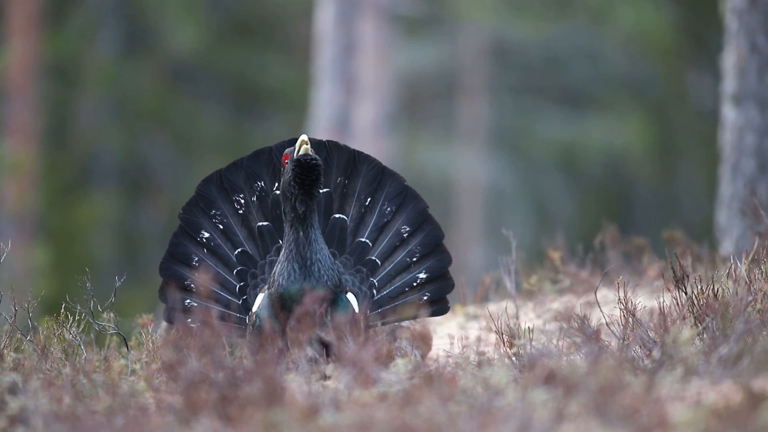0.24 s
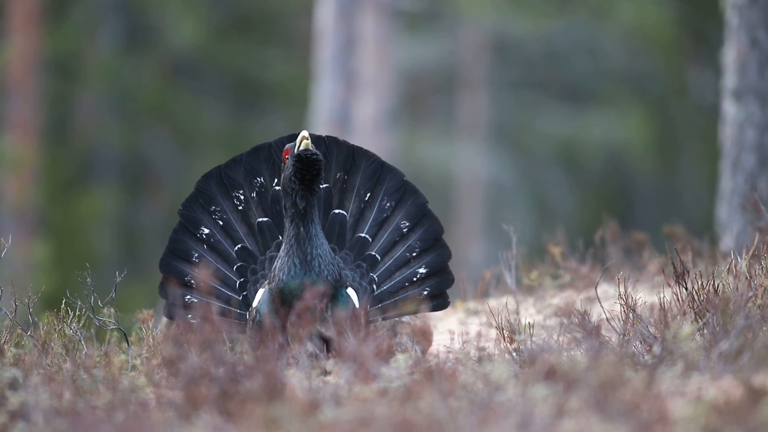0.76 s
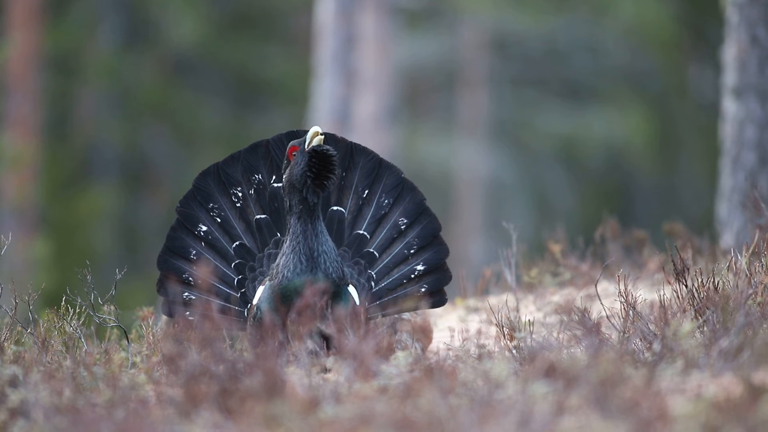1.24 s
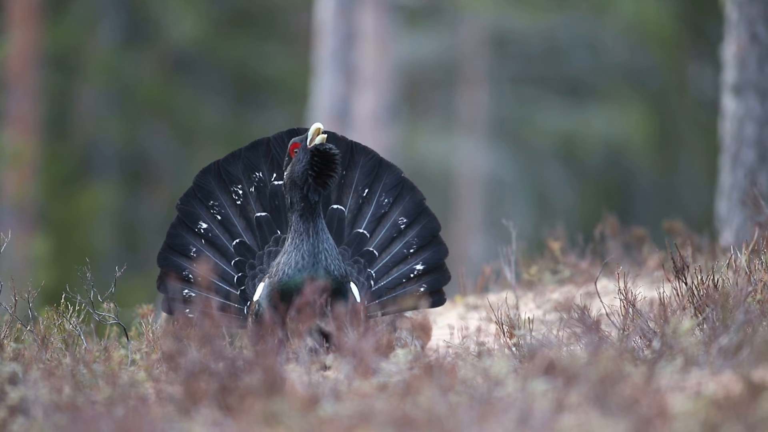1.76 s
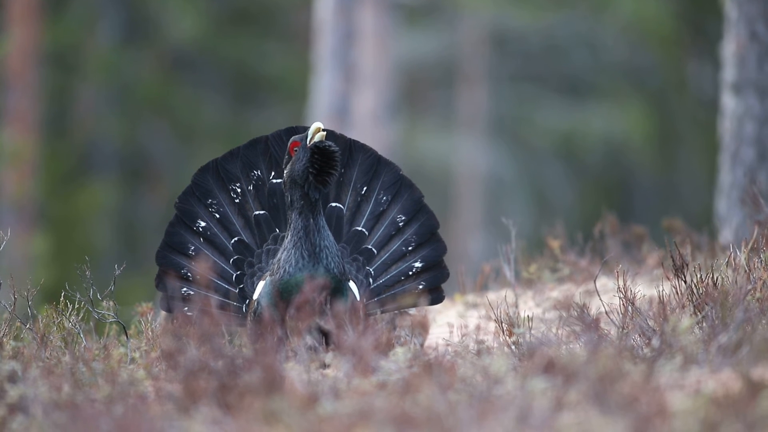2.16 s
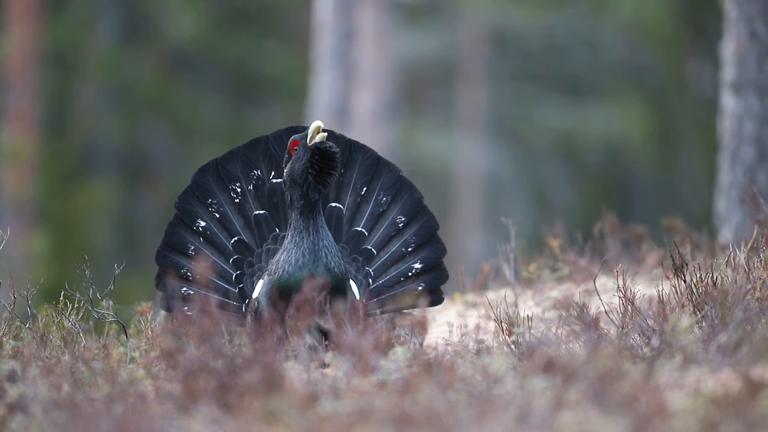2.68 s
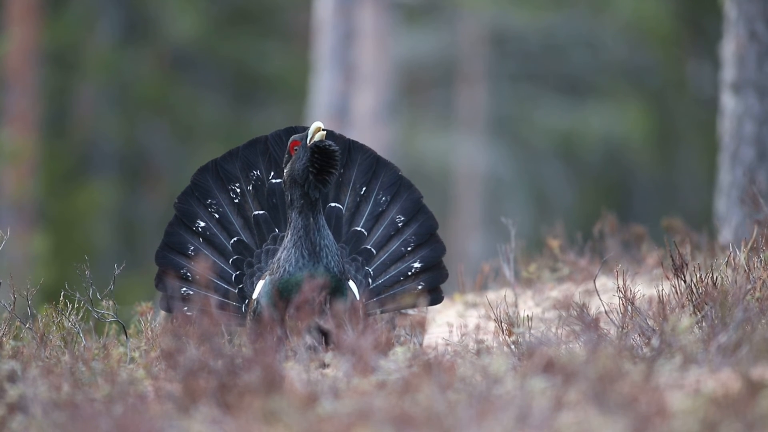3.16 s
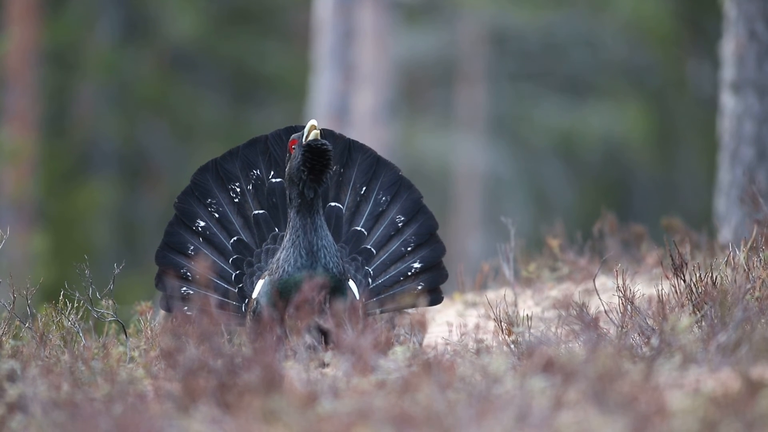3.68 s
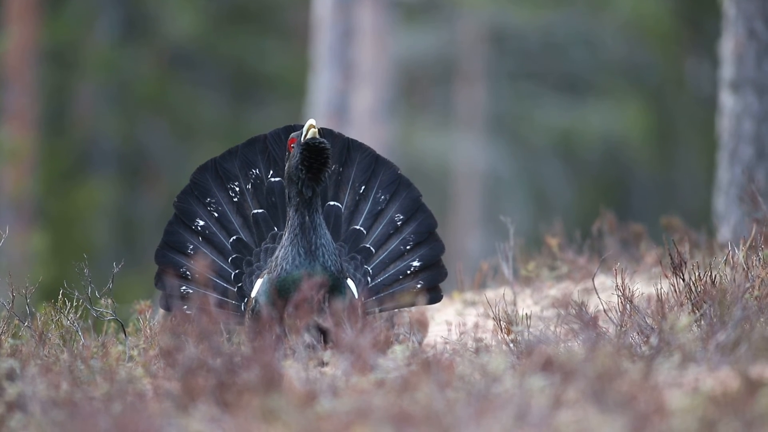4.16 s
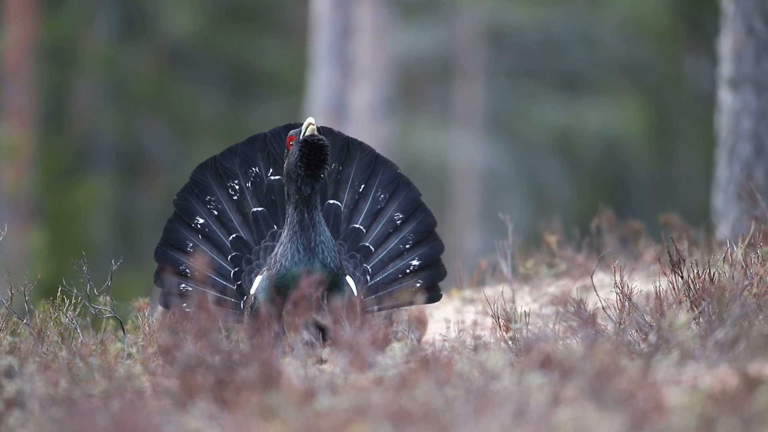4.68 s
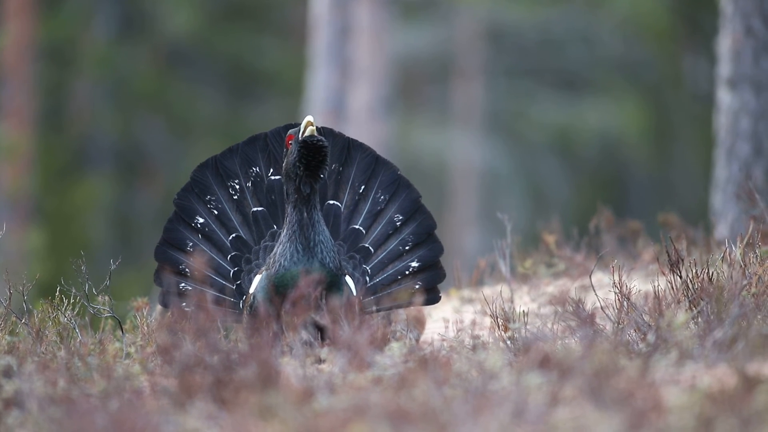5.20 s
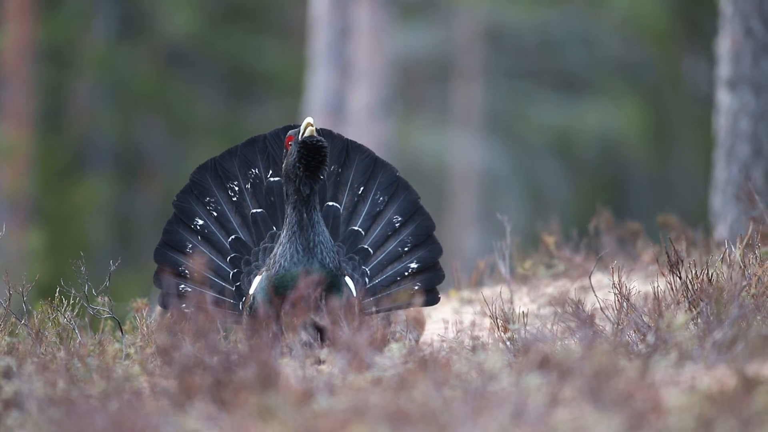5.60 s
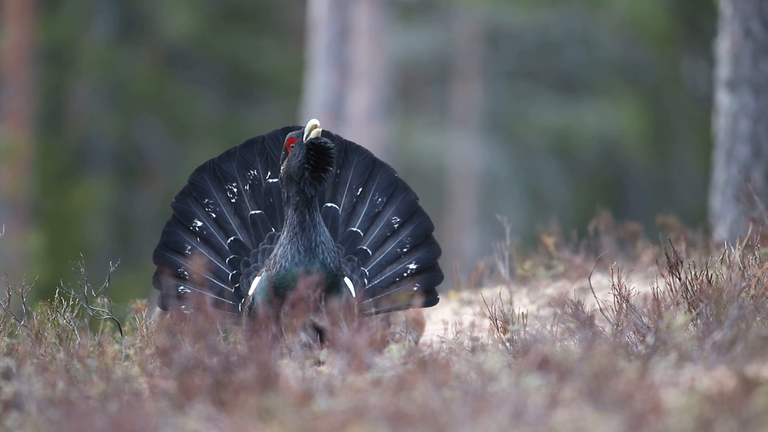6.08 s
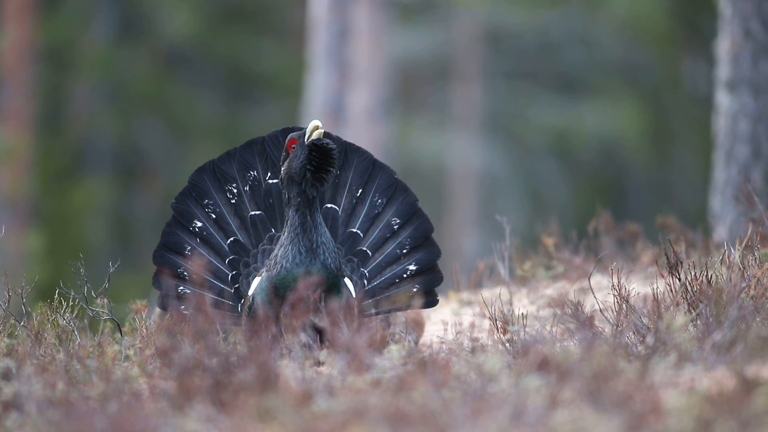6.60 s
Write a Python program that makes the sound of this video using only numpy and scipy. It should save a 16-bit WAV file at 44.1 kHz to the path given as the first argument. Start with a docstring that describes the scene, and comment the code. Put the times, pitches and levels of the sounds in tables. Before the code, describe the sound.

Close, wooden double clicks from a displaying forest bird, occasional dull ground thuds, and faint thrush song and thin whistles echoing among trees.

```python
"""Grouse display in a pine wood

A capercaillie cock displays in a quiet pine wood: pairs of dry, hollow clicks ring as damped tones of his
throat and open beak. Four soft thumps, likely his steps, are short pushes that make the peaty ground swing.
Far off, small birds whistle and a thrush sings in gliding tones, smeared by noisy echoes from the trees.
Coloured noise makes the low rumble and faint hiss behind them."""
import sys
import numpy as np
from scipy import signal
from scipy.fft import rfft, irfft, next_fast_len
from scipy.io import wavfile
from scipy.ndimage import map_coordinates

SR = 44100
rng = np.random.default_rng(int(sys.argv[2]) if len(sys.argv) > 2 else 0)


def generate_wav(signal):
    """Clip the signal to [-1, 1] and save it as 16-bit WAV at the path in sys.argv[1]."""
    frames = np.transpose(np.atleast_2d(signal))
    scaled = np.clip(frames, -1, 1) * 32767
    pcm = np.round(scaled).astype(np.int16)
    wavfile.write(sys.argv[1], SR, pcm)


N = 302085  # length in samples


def amp(db):
    """Turn decibels into a gain."""
    return 10 ** (np.asarray(db) / 20)


def unit(x):
    """Scale a sound to an average (rms) level of 1."""
    return x / np.sqrt(np.mean(x ** 2) + 1e-20)


def along(points, hz):
    """Read a curve of (Hz, value) points, with the frequencies spaced by ratio."""
    point_hz, values = np.transpose(points)
    return np.interp(np.log(hz + 1), np.log(point_hz + 1), values)


def filtered(x, response):
    """Multiply each frequency of a sound by the response at that frequency."""
    n = x.shape[-1]
    padded = next_fast_len(n + 8192)
    spectrum = rfft(x, padded)
    hz = np.fft.rfftfreq(padded, 1 / SR)
    return irfft(spectrum * response(hz), padded)[..., :n]


def noise(spectrum, shape):
    """Colour random noise by a curve of (Hz, dB) points and scale it to rms 1."""
    white = rng.standard_normal(shape)
    return unit(filtered(white, lambda hz: amp(along(spectrum, hz))))


def add(track, s, sound):
    """Mix a sound into a track at s seconds; a sound that began before zero loses its start."""
    start = round(s * SR)
    sound = sound[max(-start, 0):]
    part = track[max(start, 0):][:len(sound)]
    part += sound[:len(part)]


def scatter(x, stretch):
    """The tree trunks answer a sound with a noisy tail in which each frequency dies at its own speed."""
    # Each row: frequency in Hz, time to fall by 60 dB in seconds before stretching.
    tree_decay = [(200, 0.97), (1500, 0.48), (3000, 0.58), (5000, 0.37), (10000, 0.83)]
    hz, t, cells = signal.stft(rng.standard_normal(SR * 3 // 4), SR, nperseg=256)
    fall_s = stretch * along(tree_decay, hz)[:, None]
    tail = signal.istft(cells * amp(-60 * t / fall_s), SR, nperseg=256)[1]
    return signal.fftconvolve(x, tail / np.linalg.norm(tail))


def in_wood(timed_sounds, wet_db, stretch):
    """Place (start in seconds, sound) pairs on a track, each with its own echoes from the trunks."""
    track = np.zeros(N)
    for s, sound in timed_sounds:
        add(track, s, sound)
        add(track, s, amp(wet_db) * scatter(sound, stretch))
    return track


def capercaillie():
    """Double clicks, close by and nearly dry, are tuned by the slackening of the throat during the display."""
    # Each row: start in seconds, rms level of the first 10 ms in dB before the overall trim,
    # beak resonance in Hz, then levels in dB of beak, windpipe, gullet, bright modes and pop;
    # these five are set against the mouth resonance.
    click_rows = [(0.1956, -27.5, 3350, -10.5, -4, -0.5, -5, 2),
                  (0.331, -38, 3260, 1.5, 15.5, 6.5, 21.5, -8), (1.0858, -28, 3200, -5, 3, 1.5, -4, 6.5),
                  (1.2098, -35.5, 3134, 3.5, 7.5, -1, 12.5, -21),
                  (1.905, -29, 3160, -19, 0.5, -1, -14, 3.5), (2.0369, -33.5, 3050, -6, -2, -32, 4.5, -22),
                  (2.835, -30.5, 3070, -28, 3, 1.5, 5, -1), (2.9665, -35, 3030, -3.5, -1.5, -10, 6, -7),
                  (3.7176, -32.5, 3320, -27, 6.5, 2, 11, -15), (3.8535, -34, 2980, -3, -2.5, -6.5, 5, 3),
                  (5.1424, -30.5, 3010, 0.5, 6, -4.5, 13, -5), (5.2937, -34.5, 3000, 1, -4, 3.5, -4, 13)]
    # Each row: time in seconds, windpipe tuning as a ratio, mouth resonance in Hz.
    throat_setting = [(0.2, 1.044, 2856), (1.1, 1.02, 2794), (2.0, 1.0, 2762), (3.75, 1.0, 2590),
                      (5.2, 1.005, 2620)]
    times, tunings, mouths_hz = np.transpose(throat_setting)
    clicks = []
    for s, db, *colour in click_rows:
        tuning = np.interp(s, times, tunings)
        mouth_hz = np.interp(s, times, mouths_hz)
        clicks.append((s, click(db, tuning, mouth_hz, *colour)))
    return amp(-3.5) * in_wood(clicks, wet_db=-11.0, stretch=0.53)


def click(db, tuning, mouth_hz, beak_hz, beak_db, windpipe_db, gullet_db, bright_db, pop_db,
          gullet_hz=2145, gullet_t60=0.027, mouth_t60=0.032, beak_t60=0.05,
          pop_hz=2700, pop_t60=0.013, snap_db=-12, soft_hz=6300):
    """One sudden release of air pops and rings windpipe, gullet, mouth and beak, with a short noisy snap."""
    # The windpipe's low modes. Each row: frequency in Hz and time to fall by 60 dB in seconds (first
    # and last), both before tuning, with the level in dB within the group between them.
    windpipe_modes = [(250, -17, .06), (325, -17, .06), (812, -24.5, .07), (1452, -13.5, .058)]
    # The bright modes of the open beak. Each row: frequency in Hz, level in dB within the group,
    # time to fall by 60 dB in seconds; a small random retuning follows.
    bright_modes = [(3970, -19, 0.036), (4190, -14, 0.017), (4570, -25.5, 0.028), (5280, -28.5, 0.029),
                    (6180, -28.5, 0.0051), (5950, -25, 0.018), (8200, -11.5, 0.011)]
    # The colour of the snap. Each row: frequency in Hz, relative level in dB.
    snap_colour = [(300, -25), (1200, -48), (2000, -2), (2900, 6.5), (4200, -17), (6200, -3.5), (7000, -26),
                   (15000, -30)]
    t = np.arange(SR // 8) / SR
    windpipe = amp(windpipe_db) * ring(windpipe_modes, t * tuning)
    cavities = [(gullet_hz, gullet_db, gullet_t60), (mouth_hz, 0, mouth_t60), (beak_hz, beak_db, beak_t60)]
    mouth = ring(cavities, t)
    bright = amp(bright_db) * ring(bright_modes, t * rng.normal(1, 0.013), spread=2.1)
    # the pop swells within about a cycle, then dies away
    pop = ring([(pop_hz, pop_db, pop_t60)], t) * (1 - np.exp(-t * pop_hz))
    # the release takes a moment, which rounds off the highest treble
    soften = signal.butter(8, soft_hz, fs=SR, output="sos")
    sound = signal.sosfilt(soften, windpipe + mouth + bright + pop)
    snap_fade = amp(-60 * t / .026)
    sound = sound + amp(snap_db) * snap_fade * noise(snap_colour, len(t))
    return amp(db) * sound / np.std(sound[:SR // 100])


def ring(modes, t, spread=0):
    """Sum dying tones whose levels vary a little each time; spread scatters their starting phases."""
    total = 0
    for hz, db, t60 in modes:
        level = amp(db + .5 * rng.standard_normal() - 60 * t / t60)
        total = total + level * np.cos(2 * np.pi * hz * t + spread * rng.standard_normal())
    return total


def steps():
    """A soft push on the peat makes the ground swing a few times and settle on its lowest mode."""
    # Each row: start in seconds, peak level in dB.
    step_rows = [(0.2324, -22), (1.0834, -16), (2.0364, -12.5), (4.4388, -12)]
    # The springy peat. Each row: resonance in Hz, width in Hz.
    ground_modes = [(64, 12), (102.5, 28)]
    push = signal.butter(4, 73, fs=SR, output="sos")
    thump = signal.sosfilt(push, signal.unit_impulse(SR // 2))
    for centre, width in ground_modes:
        thump = signal.lfilter(*signal.iirpeak(centre, centre / width, fs=SR), thump)
    # a small patch of ground radiates its slowest motion poorly
    radiation = signal.butter(2, 172, "high", fs=SR, output="sos")
    thump = signal.sosfilt(radiation, thump)
    track = np.zeros(N)
    for s, db in step_rows:
        add(track, s, amp(db) * thump / np.abs(thump).max())
    return track


def thrush():
    """The thrush strings syllables together among echoing trunks, building up with a trill."""
    # The song. Each row: start in seconds, level in dB before the overall trim, syllable name.
    song_rows = [(0.0, -62, "whistle"), (0.705, -65, "mew"), (0.8, -68.5, "hum"), (1.46, -63, "mew"),
                 (1.715, -67, "hum"), (1.809, -76, "tsip"), (2.205, -68, "tsip"), (2.946, -52.5, "warble"),
                 (3.139, -51.5, "warble"), (3.336, -50.5, "flourish"), (3.622, -65, "squeak"),
                 (3.741, -54, "rasp"), (4.225, -64, "upslur"), (4.622, -64, "chip"), (4.691, -61, "chip"),
                 (4.846, -55.5, "upslur")]
    # What it can sing, by name. Each row of a syllable: delay in seconds, length in seconds,
    # first, middle and last pitch in Hz, level in dB within the syllable, buzz swing in Hz.
    syllable_notes = { "whistle": [(0, .11, 2690, 2770, 2730, 0, 75)],
                      "mew": [(0, .15, 2740, 2660, 2480, 0, 120)],
                      "hum": [(0, .06, 1970, 2000, 1970, 0, 30)],
                      "tsip": [(0, .06, 5000, 4480, 4300, 0, 50)],
                      "rise": [(0, .04, 1700, 1940, 2020, 0, 0)],
                      "squeak": [(0, .035, 4050, 4450, 4700, 0, 200)],
                      "fall": [(0, .038, 3750, 2940, 2570, 0, 0)],
                      "warble": [(0, .035, 3100, 2950, 2660, -2, 90), (.034, .04, 2560, 3180, 3330, 0, 230),
                      (.088, .034, 1920, 2400, 2330, -4, 0), (.121, .014, 2480, 2050, 1310, -5.5, 0)],
                      "flourish": [(0, .135, 3480, 3600, 3420, -6, 130),
                      (.124, .041, 2980, 2290, 1960, -6.5, 120), (.161, .034, 1960, 2700, 3120, -1, 35),
                      (.203, .029, 3100, 2720, 1560, 2, 0)], "rasp": [(0, .06, 2400, 2050, 2150, -7, 200),
                      (.049, .135, 2300, 3280, 2410, 0, 280), (.175, .09, 2450, 2100, 1850, -4, 200)],
                      "chip": [(0, .028, 3300, 3000, 2750, 0, 130)],
                      "upslur": [(0, .077, 2590, 2990, 3240, 0, 20)]}
    # the trill: low rises, and over them quicker squeaks and falls
    fall_start_s, fall_period_s, squeak_lead_s = 2.402, .151, .058
    rises = trill("rise", 2.076, .173, db=-64.5, growth_db=0.2, count=5)
    squeaks = trill("squeak", fall_start_s - squeak_lead_s, fall_period_s, db=-74, growth_db=1.5, count=4)
    falls = trill("fall", fall_start_s, fall_period_s, db=-55.0, growth_db=2.1, count=4)
    notes = []
    for s, db, syllable in song_rows + rises + squeaks + falls:
        for delay, *note in syllable_notes[syllable]:
            notes.append((s + delay, amp(db) * slur(*note)))
    return amp(1.5) * in_wood(notes, wet_db=-1.5, stretch=1.67)


def trill(syllable, start_s, period_s, db, growth_db, count):
    """Repeat a syllable at an even pace, louder each time, as (seconds, dB, syllable) rows."""
    return [(start_s + k * period_s, db + k * growth_db, syllable) for k in range(count)]


def slur(length, first_hz, middle_hz, last_hz, db, swing_hz, buzz_hz=190, uneven=0.767):
    """A quick note follows an arc of pitch; in scratchy notes the pitch shakes fast and unevenly."""
    t = np.arange(int(length * SR)) / SR
    curve = np.polyfit([0, .5, 1], [first_hz, middle_hz, last_hz], 2)
    arc = np.polyval(curve, t / length)
    jitter = map_coordinates(rng.standard_normal(256), [2 * buzz_hz * t])
    shake = np.sin(2 * np.pi * buzz_hz * t) + uneven * jitter
    return tone(arc + swing_hz * shake, db, taper=0.33)


def tone(pitch, db, taper):
    """A single bird tone follows a pitch in Hz, with soft ends."""
    envelope = signal.windows.tukey(len(pitch), np.clip(taper, 0, 1))
    return amp(db) * envelope * np.sin(2 * np.pi * np.cumsum(pitch) / SR)


def whistlers():
    """Two small birds far away each repeat their own pair of whistled notes."""
    # One bird see-saws from an upper note to a lower one. Each row: start of the lower note in seconds,
    # lower and upper levels in dB before the overall trim, pitch ratio of the lower.
    seesaw_rows = [(0.871, -61.5, -74, 0.95), (1.386, -59.5, -69, 1), (1.923, -57.5, -65, 1.01),
                   (2.448, -54, -67, 1.018), (3.005, -56.5, -62, 1), (3.544, -55.5, -60, 1.02),
                   (4.068, -57.5, -61.5, 0.99), (4.64, -60, -63, 1.03), (5.231, -57, -62.5, 1.0),
                   (5.804, -58, -63.5, 0.98), (6.355, -54.5, -59.5, 0.99), (6.9, -56.5, -62, .992)]
    # The other answers with a scoop and a sigh. Each row: start of the scoop in seconds,
    # its level in dB before the overall trim.
    answer_rows = [(-.02, -62.5), (0.433, -62), (0.95, -59.5), (4.66, -70), (5.15, -65), (5.598, -58.5),
                   (6.084, -62), (6.566, -61.5)]
    sigh_delay_s, sigh_db = .186, -3  # after the scoop, and against its level
    notes = []
    for s, lower_db, upper_db, ratio in seesaw_rows:
        # the upper note comes first, ever earlier as the song slows
        lead_s = .245 + .0065 * s
        notes.append((s - lead_s, whistle("upper", upper_db)))
        notes.append((s, whistle("lower", lower_db, ratio)))
    for s, db in answer_rows:
        notes.append((s, whistle("scoop", db)))
        notes.append((s + sigh_delay_s, whistle("sigh", db + sigh_db)))
    return amp(-6.0) * in_wood(notes, wet_db=3.5, stretch=1.4)


def whistle(name, db, ratio=1, waver_hz=24, waver_rate=140):
    """A thin note slides onto a held pitch that wavers slightly, by random points at waver_rate a second."""
    # Each named row: length in seconds, first pitch in Hz, held pitch in Hz, slide time in seconds;
    # the pitches are before the ratio.
    whistle_shapes = {"upper": (.13, 4440, 4380, .02), "lower": (.17, 3540, 3320, .035),
                      "scoop": (.17, 3820, 4140, .02), "sigh": (.17, 5120, 4710, .045)}
    length, first_hz, held_hz, slide_s = whistle_shapes[name]
    t = np.arange(int(length * SR)) / SR
    waver = waver_hz * map_coordinates(rng.standard_normal(256), [waver_rate * t])
    slide = held_hz + (first_hz - held_hz) * np.exp(-t / slide_s)
    return tone(ratio * slide + waver, db, taper=0.21)


def background(air_db=-50, hiss_db=-66.0, alike=0.35):
    """Coloured noise gives a low rumble alike in both ears, a partly unrelated hiss and a faint wide layer."""
    # Still air in the wood. Each row: frequency in Hz, relative level in dB per Hz.
    air_colour = [(15, -17.5), (28, -7.5), (42, -13), (65, 1.5), (90, -3), (135, -13), (162, -7),
                  (195, -19), (320, -21), (420, -25), (560, -25), (1000, -36), (1800, -37.5), (2900, -36),
                  (5000, -43.5)]
    # Distance dulls its highest treble. Each row: frequency in Hz, gain in dB.
    air_dulling = [(5000, 0), (8000, -5), (15000, -11)]
    # The fine hiss. Each row: frequency in Hz, relative level in dB per Hz.
    hiss_colour = [(100, 11), (1000, -9.5), (6000, -0.5), (15500, -0.5)]
    air = filtered(noise(air_colour, N), lambda hz: amp(along(air_dulling, hz)))
    share = np.clip(alike, 0, 1)
    shared_hiss = np.sqrt(share) * noise(hiss_colour, N)
    separate_hiss = np.sqrt(1 - share) * noise(hiss_colour, (2, N))
    wide_colour = [(30, -7), (70, -8), (200, -10), (550, -12.5), (1200, -13.5), (4000, -36)]  # (Hz, dB)
    # opposite signs in the two ears make this layer wide
    wide = noise(wide_colour, N) * np.array([[1], [-1]])
    return amp(air_db) * air + amp(hiss_db) * (shared_hiss + separate_hiss) + amp(-76.5) * wide


def scene():
    """Birds and steps lie straight ahead, the same in both ears, over the wider background."""
    return capercaillie() + steps() + thrush() + whistlers() + background()


def record(dry):
    """Keep nothing at or above the band limit of 15780 Hz."""
    return filtered(dry, lambda hz: hz < 15780)


dry = scene()
out = record(dry)
generate_wav(out)
```